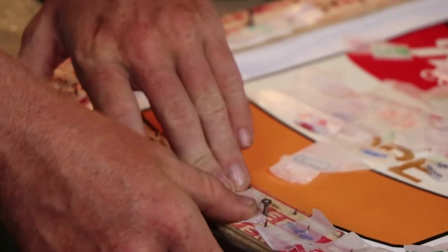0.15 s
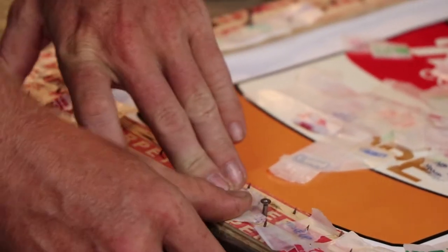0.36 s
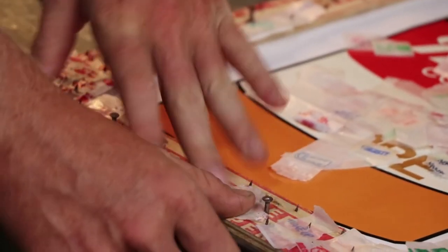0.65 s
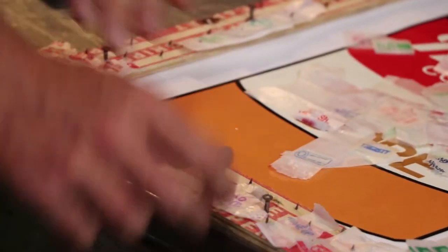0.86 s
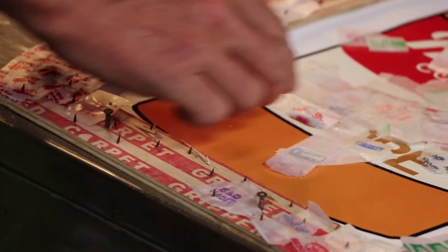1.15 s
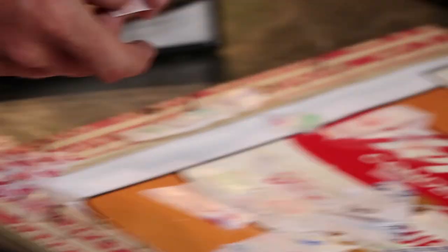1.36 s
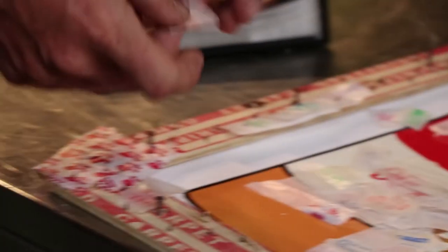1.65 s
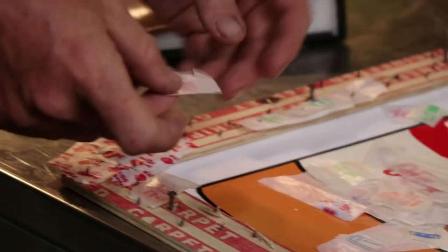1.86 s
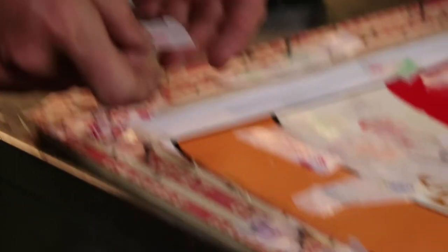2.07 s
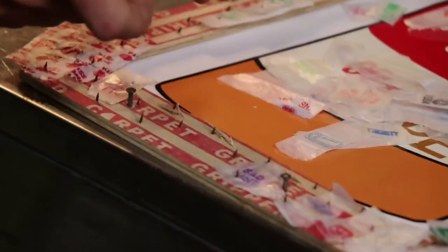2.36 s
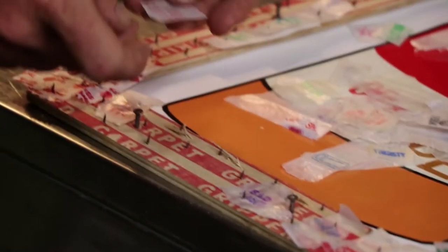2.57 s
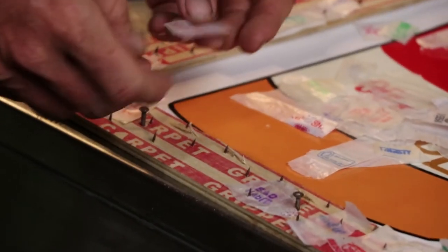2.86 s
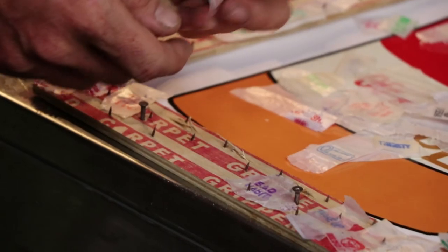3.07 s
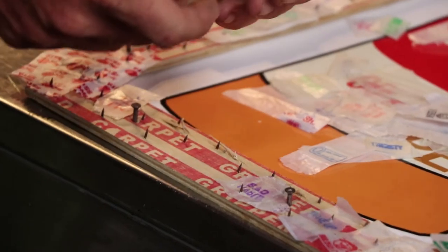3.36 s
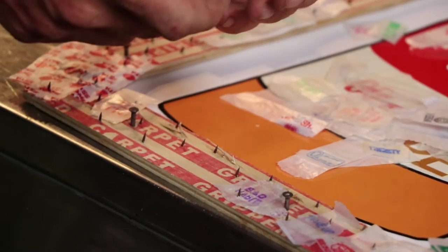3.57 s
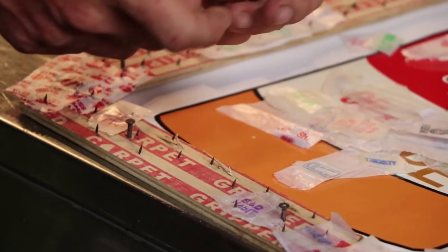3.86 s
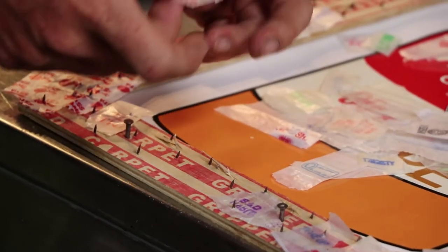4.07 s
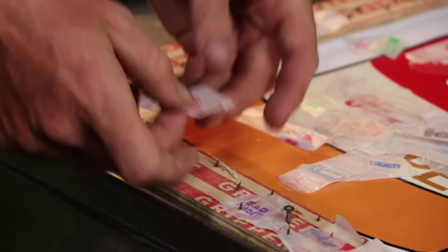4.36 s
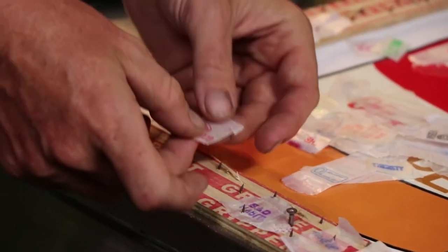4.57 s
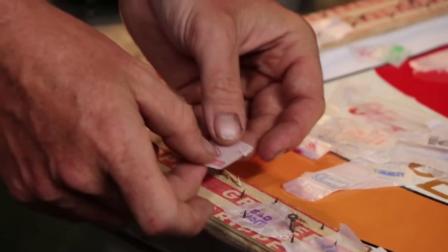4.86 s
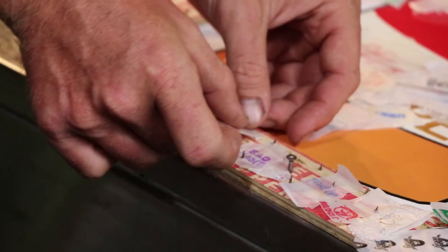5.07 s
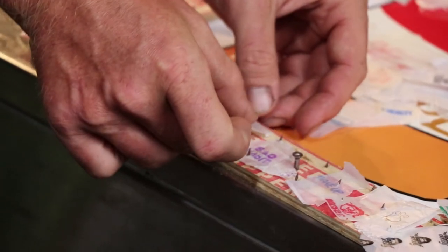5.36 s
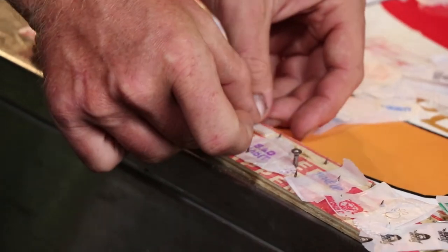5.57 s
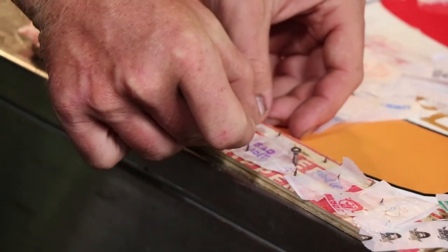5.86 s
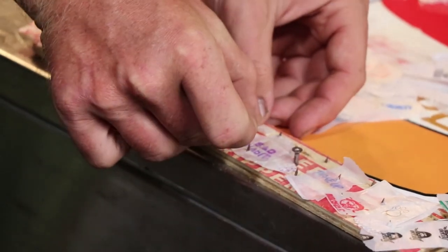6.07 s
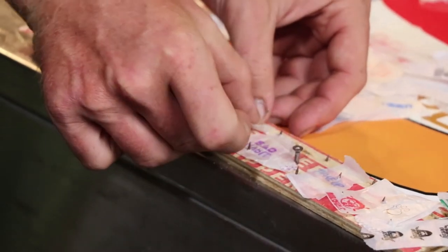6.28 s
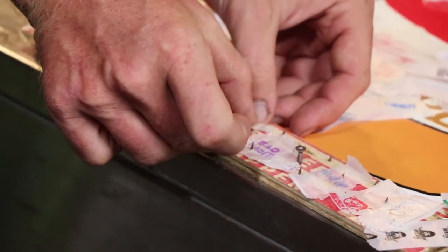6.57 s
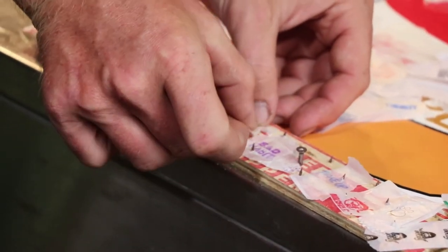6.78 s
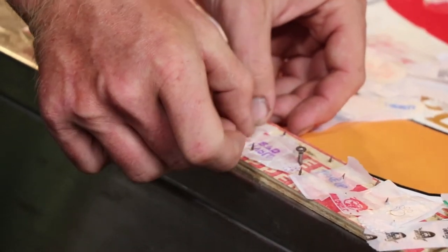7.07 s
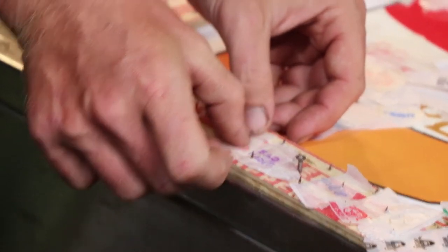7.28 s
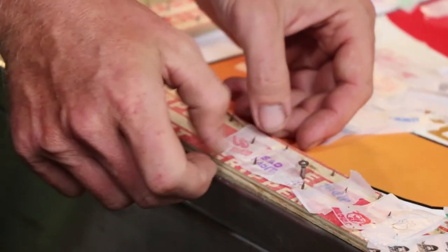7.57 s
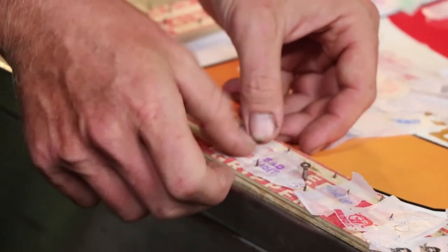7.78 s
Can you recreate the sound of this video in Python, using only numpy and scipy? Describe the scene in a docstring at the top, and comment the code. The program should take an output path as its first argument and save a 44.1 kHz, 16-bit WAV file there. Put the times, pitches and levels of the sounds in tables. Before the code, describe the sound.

Close, light paper crinkles and sharp little ticks come as fingertips push scraps onto a wooden frame, tapping the wood softly. After a few scattered clusters and a lull, the paper crackles more densely, with a few soft low knocks, then fades to a faint rustle. Throughout, a steady low hum, like a compressor's, and a soft hiss of air fill the small workroom.

```python
"""A workroom: a motor, likely a compressor, hums steadily over the room's soft air noise.
The hum is a stack of tones set by the turning shaft; twice the sound jumps with a soft thump.
Close by, fingers press paper scraps onto the tacks of a wooden frame. The wood gives dull taps,
creases snap, and the paper rustles with many tiny slips. These sounds echo off the table and walls."""
import sys
import numpy as np
from scipy import signal
from scipy.io import wavfile
from scipy.ndimage import uniform_filter1d

SR = 44100
rng = np.random.default_rng(int(sys.argv[2]) if len(sys.argv) > 2 else 0)


def wav_out(sig):
    """Save sig, one row per channel (or a flat mono array), as 16-bit PCM at SR to the path in sys.argv[1]."""
    wavfile.write(sys.argv[1], SR, np.round(np.clip(np.atleast_2d(sig).T, -1, 1) * 32767).astype(np.int16))


N = 349272

# Stretches of steady hum, joined end to end: start_s, shaft_hz, phase_offset_turns
# The first offset sets where the wave starts; the other two make it jump at the joins.
HUM_STRETCHES = [(0, 58.785, -.297), (1.3005, 58.780, -.337), (4.938, 58.770, .066)]
# The hum's tones, each a whole multiple of the shaft's speed: multiple, left_db, right_db
SHAFT_TONES = [(1, -33.0, -33.0), (2, -72.0, -73.0), (3, -54.0, -53.0), (5, -61.0, -60.0),
               (6, -68.0, -67.0), (7, -59.0, -57.0), (9, -72.0, -72.0), (11, -73.0, -76.0),
               (13, -73.0, -72.0), (23, -79.0, -77.0), (29, -78.0, -67.0), (30, -80.0, -87.0),
               (31, -95.0, -79.0), (33, -79.0, -80.0), (35, -91.0, -79.0), (36, -87.0, -79.0),
               (52, -83.0, -81.0), (55, -77.0, -80.0), (56, -88.0, -76.0), (57, -77.0, -79.0),
               (78, -90.0, -88.0), (82, -89.0, -81.0), (97, -90.0, -81.0), (101, -79.0, -80.0),
               (102, -86.0, -79.0), (104, -93.0, -87.0), (106, -89.0, -83.0), (115, -83.0, -79.0),
               (116, -80.0, -75.0), (117, -79.0, -81.0)]
# How one whining tone of the hum swells: time_s, gain_db
WHINE_GAIN = [(0, -1.5), (3, -2.5), (4.9, -1.5), (5.5, 2), (7, 3.5), (7.92, 5.5)]
# Mains tones, which do not follow the shaft: pitch_hz, left_db, right_db
MAINS_TONES = [(241.4, -69.5, -71.5), (968, -79, -77), (1030, -96, -96)]
# How strong the air noise is, from low to high: pitch_hz, level_db_per_hz
AIR_LEVELS = [(20, -84), (90, -87), (130, -85), (250, -84.5), (420, -83.5), (560, -89), (1300, -91),
              (1500, -93.5), (3300, -96), (4400, -100.5), (5150, -102.5), (5800, -99), (8500, -99.5),
              (12000, -104), (15800, -110)]
# How alike the air noise is left and right (1 means the same): pitch_hz, likeness
AIR_LIKENESS = [(60, 1), (115, 0.99), (200, 0.41), (500, 0.066), (1400, 0.016), (3100, -0.2), (8000, 0.013)]
# Which side the air noise is louder on: pitch_hz, left_minus_right_db
AIR_BALANCE = [(60, -1), (130, -3.5), (400, 0), (2400, -1.5), (5000, -1.5), (15000, -0.5)]
# Fingertips tapping the frame: start_s, peak_db, pitch_hz
FINGER_TAPS = [(.124, -51, 1100), (.142, -48, 1280), (0.624, -45, 1920), (.6703, -45, 1250),
               (.776, -45, 1190), (0.8276, -45, 1150), (1.4016, -40, 1250), (3.0444, -52, 1360),
               (6.1873, -52, 1710)]
# Heavier pushes that ring the frame's low note: start_s, peak_db
HEAVY_PUSHES = [(6.192, -45), (6.633, -53), (6.886, -51), (6.908, -49)]
# Paper snaps, a tick over two lower rings: start_s, tick_peak_db, tick_hz, low_body_db, middle_body_db
PAPER_SNAPS = [(.3415, -54, 7250, -59, -63), (.3612, -24, 11500, -63, -58), (.542, -50, 7410, -58, -64),
               (0.6678, -30.5, 10000, -61, -68), (.6747, -35, 9310, -64, -66), (.776, -48, 8050, -52, -62),
               (1.4015, -46, 8000, -59, -58), (1.4056, -43, 7500, -60, -57), (1.4115, -36, 7200, -62, -59),
               (1.488, -33.5, 6500, -57, -53), (1.5102, -25, 7600, -60, -46),
               (2.377, -50, 7600, -53.5, -62), (2.511, -54, 7220, -57, -62),
               (3.0778, -52, 7270, -56.5, -58), (3.1248, -31, 11400, -62, -64),
               (3.9995, -45, 8260, -55, -59.5), (5.837, -43, 6000, -70, -59),
               (6.0663, -27.5, 10400, -58, -51.5), (6.2171, -27, 8900, -64, -44),
               (6.3743, -26.5, 10100, -60, -52.5), (6.6005, -44, 10300, -66, -68),
               (6.678, -41, 9000, -72, -71), (6.729, -35.5, 9500, -72, -66), (6.7452, -37, 10000, -71, -69),
               (6.7717, -37, 10800, -71, -66), (6.8016, -39, 10700, -68, -66),
               (6.8818, -31, 10500, -68, -64), (6.8964, -36, 9410, -64, -64), (6.915, -30, 8200, -64, -62),
               (7.0764, -37, 10500, -64, -59), (7.1836, -35, 6500, -63, -59)]
# A faint snap, played at random times: tick_peak_db, tick_hz, low_body_db, middle_body_db
FAINT_SNAP = (-54, 7800, -61, -64)
# The two lower rings that give a snap its body: low_hz, middle_hz
SNAP_BODY_HZ = (1970, 4250)
# Paper being rubbed and bent: loudest_s, level_db, pitch_hz, swell_s, fade_s
PAPER_RUSTLES = [(.64, -70, 1800, .08, .1), (.78, -63, 2000, .04, 0.089), (.685, -62, 9800, .01, .05),
                 (.772, -54, 10200, .03, 0.031), (1.415, -67, 8500, .004, .09),
                 (1.494, -62, 8500, .004, .04), (1.524, -55, 8400, .016, .05), (1.6, -66, 10500, .12, .13),
                 (2.27, -69, 11000, .11, .15), (2.345, -66, 11200, .1, .18), (2.862, -66, 10500, .09, .1),
                 (3.135, -59.5, 11200, .12, 0.092), (4.104, -71, 9500, .2, .16),
                 (6.07, -50, 10300, 0.0036, .04), (6.1, -65, 10200, .03, .15),
                 (6.381, -52.5, 9600, .003, .033), (6.42, -68, 9200, .04, .15),
                 (6.61, -57, 9400, 0.028, .05), (6.65, -71, 9200, .05, .15), (6.736, -64, 9500, 0.11, .1),
                 (6.81, -64, 9700, .1, .055), (6.886, -52, 8500, .003, 0.034),
                 (6.925, -42, 8300, .007, 0.029), (6.95, -60, 8000, .03, .07), (7.25, -71, 9000, .1, .3),
                 (7.348, -67, 10000, .12, 0.22)]
# Echoes off the table and nearby walls: delay_ms, level_db
NEAR_ECHOES = [(1.0, -7), (4.0, -8.5), (6.3, -6.5), (9.8, -10)]
# How long the room takes to fade by 60 dB: pitch_hz, fade_s
ROOM_FADES = [(500, 0.45), (3000, 0.06), (9000, 0.24), (15000, 0.11)]
# A slight softening of the treble around 5 kHz: pitch_hz, width_hz, gain_db
TREBLE_DIP = (5150, 1100, -1.5)


def amp(db):
    """Turns decibels into a number to multiply by."""
    return 10 ** (np.asarray(db) / 20)


def unit_level(x):
    """Scales a signal so that its average level (rms) is 1."""
    return x / np.sqrt(np.mean(x ** 2) + 1e-30)


def value_at(table, hz):
    """Reads between a table's rows, giving each octave equal room."""
    pitches, values = np.transpose(table)
    return np.interp(np.log(hz + 1), np.log(pitches + 1), values)


def drift(fastest_hz):
    """A slow random wander, made of 20 slow waves."""
    t = np.arange(0, N / SR + 1, .01)
    rates = np.geomspace(fastest_hz / 20, fastest_hz, num=20)
    wander = sum(np.sin(2 * np.pi * (hz * t + rng.random())) / np.sqrt(hz) for hz in rates)
    return np.interp(np.arange(N) / SR, t, unit_level(wander))


def add(mix, start_s, sound, right_db):
    """Adds a sound to the mix, right_db louder on the right than on the left."""
    stereo = sound * amp([[-right_db / 2], [right_db / 2]])
    part = mix[:, round(start_s * SR):][:, :stereo.shape[1]]
    part += stereo[:, :part.shape[1]]


def ring(peak_db, hz, fade_cycles, grit, noise):
    """A quickly dying tone, roughened by the noise and as long as it."""
    t = np.arange(noise.shape[-1]) / SR
    wave = np.sin(2 * np.pi * hz * t) * (1 + grit * noise)
    wave *= np.exp(-t * hz / fade_cycles) * np.minimum(t * hz * 2, 1)
    return amp(peak_db) * wave / abs(wave).max()


def motor_hum(last_locked=7, whine_multiple=29, waver_db=1.9, blend_s=.0025):
    """A turning shaft makes a stack of tones: low ones hold steady, high ones waver, one whine swells."""
    t, out = np.arange(N) / SR, np.zeros((2, N))
    phases = rng.random(len(SHAFT_TONES))
    lag_cycles, right_lead_cycles = .24, .0074
    wobble_turns = .0012 * drift(3.3)  # uneven running blurs the high tones
    whine_db = np.interp(t, *np.transpose(WHINE_GAIN))
    gains = []
    for multiple, _, _ in SHAFT_TONES:
        wander_db = waver_db * (multiple > last_locked) * drift(3.5)
        gains.append(amp(whine_db if multiple == whine_multiple else wander_db))
    ends = [row[0] for row in HUM_STRETCHES[1:]] + [N / SR + 1]
    turns_so_far = 0
    for (start, shaft_hz, offset), end in zip(HUM_STRETCHES, ends):
        span = slice(max(round((start - blend_s) * SR), 0), round((end + blend_s) * SR))
        turns = turns_so_far + offset + shaft_hz * (t[span] - start) + wobble_turns[span]
        fade_in = np.clip((t[span] - start) / blend_s + .5, 0, 1) if start else 1
        fade_out = np.clip((end - t[span]) / blend_s + .5, 0, 1)
        for (multiple, *sides_db), phase, gain in zip(SHAFT_TONES, phases, gains):
            if multiple <= last_locked:  # low tones keep a set lag behind the lowest
                phase = -lag_cycles * (multiple > 1)
            side_shift = right_lead_cycles * (multiple - 1) * np.array([[-.5], [.5]])
            tone = np.sqrt(2) * np.cos(2 * np.pi * (multiple * turns + phase + side_shift))
            out[:, span] += amp(sides_db)[:, None] * tone * gain[span] * fade_in * fade_out
        turns_so_far += offset + shaft_hz * (end - start)
    return out


def mains_hum(wobble_cycles=.06, waver_db=2.0):
    """The mains adds three faint tones that waver a little in pitch and level."""
    t, out = np.arange(N) / SR, np.zeros((2, N))
    for hz, *sides_db in MAINS_TONES:
        cycles = hz * t + rng.random() + wobble_cycles * drift(2.5)
        tone = np.sqrt(2) * np.cos(2 * np.pi * cycles)
        out += amp(sides_db)[:, None] * tone * amp(waver_db * drift(2.3))
    return out


def air_noise(patchy_db=1.0):
    """The room's air: a soft rush with faint louder and quieter patches, built in short slices."""
    slices, hz = N // 512 + 5, np.fft.rfftfreq(2048, 1 / SR)
    a, b, c, d, patches = rng.standard_normal((slices, len(hz), 5)).T
    patches = uniform_filter1d(patches, size=24, axis=0)  # smooth across pitch
    patches = unit_level(uniform_filter1d(patches, size=8, axis=1))  # then across time
    likeness = np.clip(value_at(AIR_LIKENESS, hz), -1, 1)[:, None]
    left = a + 1j * b
    right = likeness * left + np.sqrt(1 - likeness ** 2) * (c + 1j * d)
    side_db = value_at(AIR_BALANCE, hz)[:, None] / 2
    level_db = value_at(AIR_LEVELS, hz)[:, None] + patchy_db * patches + np.array([side_db, -side_db])
    rush = signal.istft(np.array([left, right]) * amp(level_db), nperseg=2048, noverlap=1536)[1]
    unshaped_level = signal.istft(left, nperseg=2048, noverlap=1536)[1].std()
    return rush[:, :N] / unshaped_level * np.sqrt(SR / 2)


def frame_taps(low_note_hz=345):
    """Fingertips make the wood ring briefly and dully; heavier pushes ring a longer, low note."""
    out = np.zeros((2, N))
    for start_s, db, hz in FINGER_TAPS:
        tap = ring(db, hz, fade_cycles=2.4, grit=.5, noise=rng.standard_normal(512))
        add(out, start_s, tap, right_db=1.5)
    for start_s, db in HEAVY_PUSHES:
        knock = ring(db, low_note_hz, fade_cycles=6, grit=0, noise=np.zeros(4096))
        add(out, start_s, knock, right_db=1)
    return out


def paper_snaps(faint_per_s=1.2):
    """A crease gives way: a bright tick over two dry, lower rings, rough in its own way on each side."""
    out = np.zeros((2, N))
    faint_times = rng.uniform(0, N / SR, round(faint_per_s * N / SR))
    snaps = [(start_s, *FAINT_SNAP) for start_s in faint_times] + PAPER_SNAPS
    for start_s, tick_db, tick_hz, *bodies_db in snaps:
        noise = uniform_filter1d(rng.standard_normal((2, 256)), size=3)
        snap = ring(tick_db, tick_hz, fade_cycles=1.3, grit=.4, noise=noise)
        for body_db, body_hz in zip(bodies_db, SNAP_BODY_HZ):
            body = ring(0, body_hz, fade_cycles=.8, grit=.3, noise=noise)
            peak_over_average = unit_level(body[:, :SR // 200]).max()  # in the first 5 ms
            snap += amp(body_db) * peak_over_average * body
        add(out, start_s, snap, right_db=2.5)  # the paper lies to the right
    return out


def paper_rustles(slips_per_s=9000, band_width=.9, centred_share=.78, swell_db=20):
    """Many tiny slips of uneven size across the sheet blur into a hiss that swells and fades."""
    out = np.zeros((2, N))
    for loudest_s, db, hz, swell_s, fade_s in PAPER_RUSTLES:
        t = np.arange(-swell_s, fade_s, 1 / SR)
        chance, sign, size, place = rng.random((len(t), 4)).T
        slips = (chance < slips_per_s / SR) * np.sign(sign - .5) * amp(-2 * np.log(size + 1e-3))
        slips = slips * np.where(place < centred_share, 1, [np.cos(40 * place), np.sin(40 * place)])
        # Shift down by hz, smooth three times, shift back: each slip rings a broad band around hz.
        shift = np.exp(2j * np.pi * hz * t)
        decay = np.exp(-np.pi * band_width * hz / SR)
        hiss = (shift * signal.lfilter([1], np.poly([decay] * 3), slips / shift)).real
        level_db = db - swell_db * np.maximum(-t / swell_s, t / fade_s)
        add(out, loudest_s - swell_s, unit_level(hiss) * amp(level_db), right_db=4.1)
    return out


def room_echo(sound, tail_db=-2.5, build_ms=5.0, scatter_ms=.15, travel_ms=1.3):
    """The table and walls send back a few clear echoes, then a tail of many small ones dies away."""
    clicks = np.zeros((2, SR // 2))
    spots = np.arange(0, SR // 2 - 20, 20) + rng.integers(0, 20, (2, (SR // 2 - 1) // 20))
    np.put_along_axis(clicks, spots, rng.choice([-1., 1.], spots.shape), 1)
    hz, t, bands = signal.stft(clicks, SR, nperseg=128)
    bands = bands * amp(-60 * t / value_at(ROOM_FADES, hz)[:, None])
    echoes = signal.istft(bands, SR, nperseg=128)[1]
    ms = np.arange(echoes.shape[1]) / SR * 1000
    echoes *= np.minimum(ms / build_ms, 1)
    echoes *= amp(tail_db) / np.linalg.norm(echoes[0])
    echoes[:, 0] = 1  # the sound that arrives directly
    for delay_ms, db in NEAR_ECHOES:  # uneven surfaces scatter each echo into a short burst
        burst = rng.standard_normal(echoes.shape) * np.exp(-abs(ms - delay_ms) / scatter_ms)
        echoes += amp(db) * burst / np.linalg.norm(burst, axis=1, keepdims=True)
    echoes = np.pad(echoes, ((0, 0), (round(travel_ms * SR / 1000), 0)))
    return signal.oaconvolve(sound, echoes, axes=1)[:, :N]


def scene():
    """The handwork echoes in the room, over the hum and the air."""
    background = motor_hum() + mains_hum() + air_noise()
    handwork = paper_snaps() + frame_taps() + paper_rustles()
    return background + room_echo(handwork)


def record(dry, top_hz=15760):
    """Softens the treble slightly around 5 kHz and cuts off everything above top_hz."""
    hz = np.linspace(0, SR / 2, num=257)
    dip_hz, width_hz, dip_db = TREBLE_DIP
    gain_db = dip_db * np.exp(-4 * ((hz - dip_hz) / width_hz) ** 2)
    dip = signal.firwin2(255, hz, amp(gain_db), fs=SR)
    top_cut = signal.firwin(511, top_hz, window=("kaiser", 9), fs=SR)
    return signal.oaconvolve(dry, np.convolve(dip, top_cut)[None], "same")


dry = scene()
out = record(dry)
wav_out(out)
```